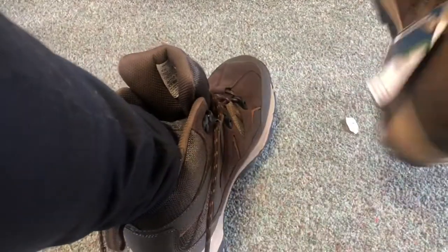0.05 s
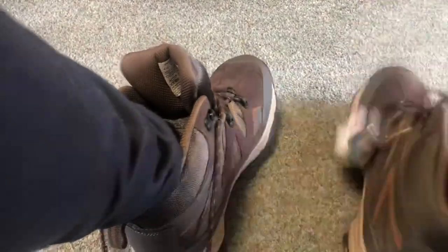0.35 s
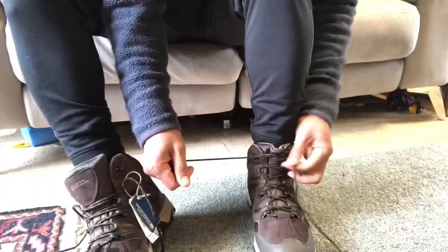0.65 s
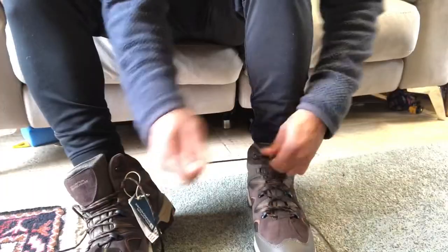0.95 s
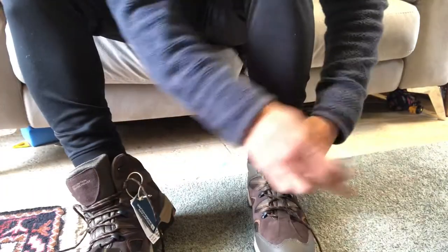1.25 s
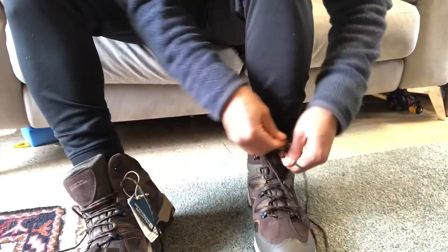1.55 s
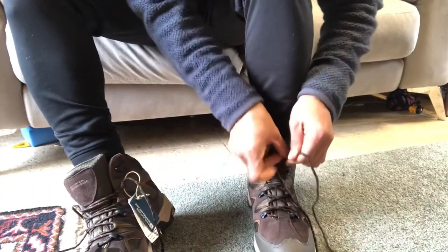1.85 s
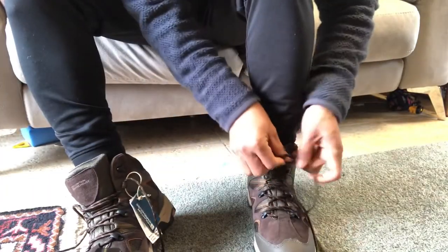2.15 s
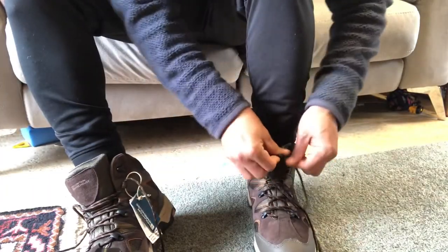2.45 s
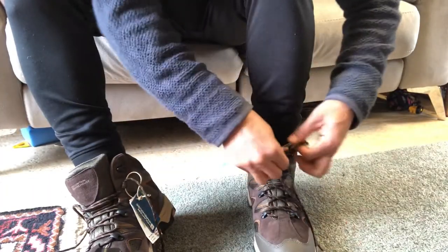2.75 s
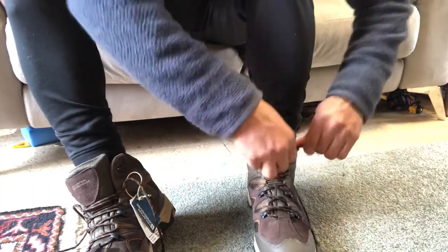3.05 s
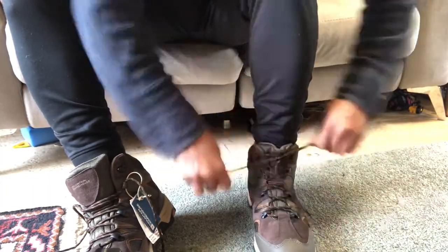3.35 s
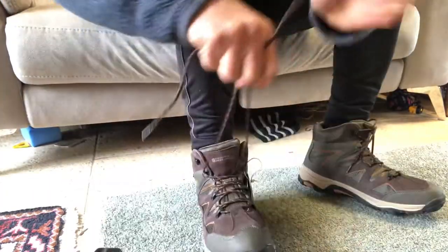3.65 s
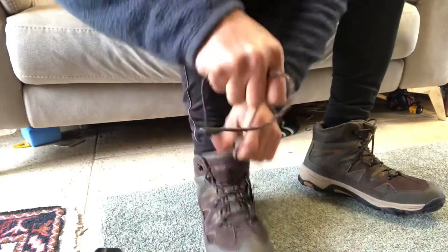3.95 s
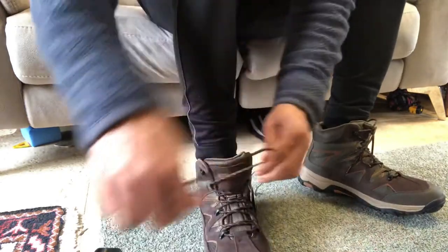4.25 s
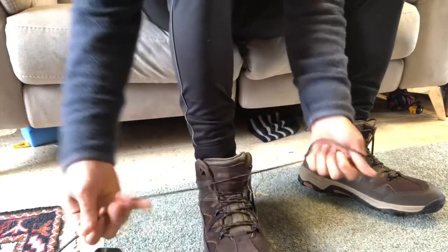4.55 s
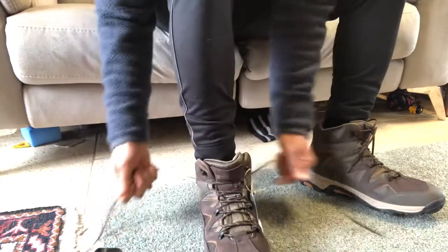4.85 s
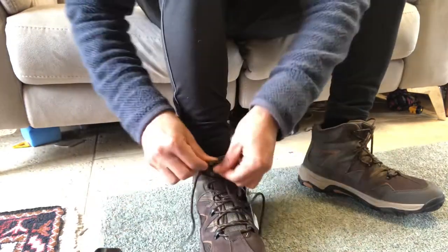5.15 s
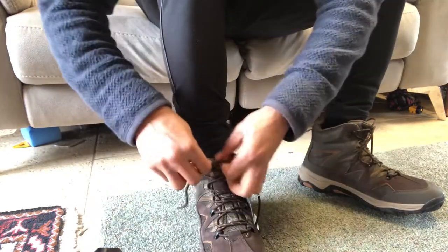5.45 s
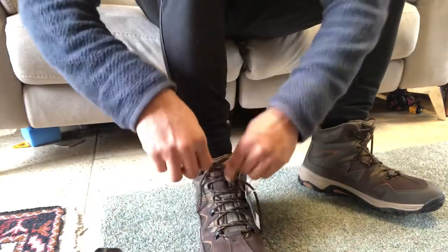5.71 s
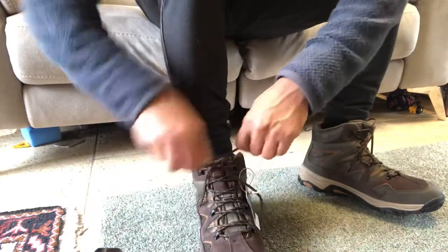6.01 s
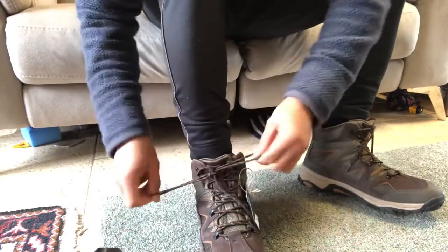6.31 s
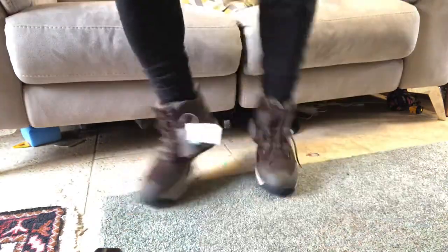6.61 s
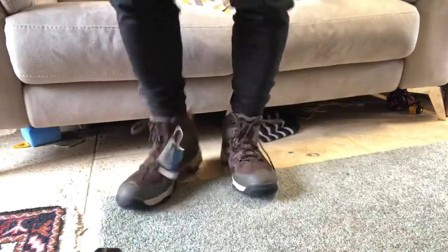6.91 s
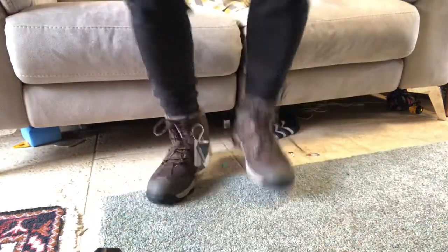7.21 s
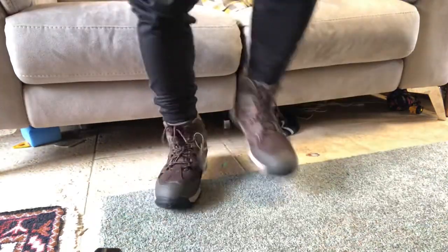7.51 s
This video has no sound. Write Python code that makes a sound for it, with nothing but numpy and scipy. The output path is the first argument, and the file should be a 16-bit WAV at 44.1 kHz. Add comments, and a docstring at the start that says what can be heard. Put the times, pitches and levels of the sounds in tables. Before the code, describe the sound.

Close to the microphone in a quiet living room, someone laces up walking boots. One knock and scrape of a sole comes first, followed by faint clothing rustle, short zips of lace and scattered ticks as it catches in the hooks. Near the end come about six quick, louder steps on the carpeted floor, with scuffs, rattling lace ends and a tiny metallic ring.

```python
"""Someone on a sofa laces up walking boots, close by in a quiet living room. Sleeves rustle over still
air and a faint hum as a boot is set down with a knock and a scuff. For six seconds braided laces swish
through the hooks and snap tight, plucking the leather. The hum swells again; then, from 6.6 s, the boots
step on the spot: a bit of metal rings, sole and heel slap and thump the carpeted floor, tag and lace ends
rattle. Near walls echo softly throughout, and the level dips briefly four times."""
import sys
import numpy as np
from scipy import signal
from scipy.fft import rfft, irfft, next_fast_len
from scipy.io import wavfile

SR = 44100
rng = np.random.default_rng(int(sys.argv[2]) if len(sys.argv) > 2 else 0)


def transcribe(u):
    """Save the signal u as a 16-bit wav file named by the first command-line argument.

    u: samples, shape (n,) or (channels, n), limited to [-1, 1]; the rate is SR.
    q: integer samples, one column per channel.
    """
    v = np.clip(np.atleast_2d(u).T, -1, 1)
    q = np.round(v * 32767).astype(np.int16)
    wavfile.write(sys.argv[1], SR, q)


N = 342657

# tone of the still air: (frequency [Hz], level [dB])
AIR_TONE = [(15, -38), (28, -1), (52, -7), (100, -5), (160, -6.5), (245, -5), (300, -9.5), (420, -9.5),
            (800, -14), (1780, -22), (4000, -25.5), (8000, -28.5), (15800, -31)]
# swells of a deep hum: (middle [s], half length [s], level [dB])
HUM_SWELLS = [(0.186, 0.14, -63), (6.295, 0.1, -55.5)]
# rustle riding on how briskly the limbs move: (time [s], level [dB])
RUSTLE_CURVE = [(0, -58), (.15, -73), (1.0, -76), (1.7, -62), (2.15, -90), (2.85, -67), (3.05, -83),
                (3.65, -87), (3.88, -64), (4.1, -70.5), (4.95, -64), (5.3, -73.5), (6.3, -72.5),
                (6.7, -56.5), (6.9, -64.5), (7.2, -56), (7.77, -65)]
# tone of brushing fabric: (frequency [Hz], level [dB])
FABRIC_TONE = [(80, -7.5), (250, -2.5), (600, 5), (1300, 1.5), (2000, -1), (3200, -4), (4500, -3.5),
               (7000, -10), (11000, -16), (16000, -8.5)]

# laces snapping taut and bumps on the leather: (time [s], level [dB], pitch [Hz], tick level [dB])
LACE_SNAPS = [(.213, -45, 704, -67), (.2492, -26.5, 565, -66), (.2615, -22.5, 980, -54),
              (.688, -52.5, 1320, -50), (1.199, -51, 544, -57), (1.233, -54, 1130, -50),
              (1.397, -62, 2500, -42.5), (1.440, -46, 814, -66), (2.4256, -37.5, 1700, -34),
              (2.4275, -39, 500, -56), (2.762, -48, 680, -68), (3.146, -37, 610, -49),
              (3.164, -36, 526, -50), (3.740, -47.5, 1290, -62), (3.862, -32.5, 990, -57),
              (3.899, -55, 1500, -47), (4.064, -44, 515, -51), (4.2838, -31.5, 1700, -37.5),
              (4.2865, -36.5, 530, -57), (4.640, -50, 554, -57), (4.762, -45, 664, -58),
              (4.961, -49, 1010, -43.5), (5.261, -49.5, 360, -60), (5.682, -49, 377, -61),
              (5.9610, -31.5, 1410, -23.5), (6.0850, -37, 1340, -43), (6.5912, -65, 1100, -36),
              (7.649, -38, 1147, -43.5)]
# tone of a lace ticking into a hook: (frequency [Hz], level [dB])
TICK_TONE = [(400, -30), (1200, -18), (2300, 9), (3200, 6.5), (4600, 4), (6500, -4), (9000, -6),
             (16000, -26)]
# tone of struck leather and tread: (frequency [Hz], level [dB])
LEATHER_TONE = [(100, -7.5), (250, -2.5), (420, 3), (580, 4), (800, 5.5), (1050, -3.5), (1500, -8.5),
                (2200, -14), (4000, -20.5), (10000, -37)]

# soles hitting the floor: (time [s], slap [dB], pitch [Hz], attack [cycles], thump [dB], crack [dB])
SOLE_HITS = [(0.2481, -18, 953, 1.33, -20, -54), (6.6168, -25, 1120, 1.8, -34.5, -46),
             (6.9407, -27, 1280, 1.22, -33.5, -58), (7.1369, -18, 1720, .7, -29.5, -36),
             (7.3200, -31.5, 1210, 1.25, -30, -48), (7.5125, -19, 1190, 1.1, -33.5, -34.5),
             (7.6960, -27, 1430, 1.06, -31.5, -56)]
# tone of the crack on top of a slap: (frequency [Hz], level [dB])
CRACK_TONE = [(400, -47), (1500, -10.5), (2500, 23), (4000, 6), (6000, -3), (9000, -21.5), (16000, -6)]
# short scuffs of sole and tag: (time [s], level [dB])
SCUFF_HITS = [(.262, -32), (.2793, -26.5), (.2850, -25.5), (.359, -50), (.387, -47), (6.625, -32.5),
              (6.6728, -21), (6.783, -47), (6.981, -42.5), (7.033, -42.5), (7.361, -37.5), (7.370, -34),
              (7.744, -37)]
# gritty tone of a scuff: (frequency [Hz], level [dB])
GRIT_TONE = [(300, -14), (1500, -3.5), (3500, 5.5), (5500, 6.5), (8000, -2), (11000, -1.5), (13000, -8),
             (16000, 3)]

# lace drawn through the hooks: (middle [s], half length [s], rasp [dB], pitch [Hz], tension [0-1])
LACE_PULLS = [(0.448, 0.0073, -53.5, 2280, 0.72), (.547, .015, -58.5, 1800, .25),
              (1.524, 0.044, -66.5, 4100, 0.81), (2.416, 0.0049, -59, 2500, 0.56),
              (3.195, 0.028, -51.5, 2150, 0.83), (3.762, 0.016, -64.5, 1360, 0.74),
              (4.214, 0.041, -68, 3400, 0.83), (4.318, 0.048, -59, 1280, 0.66),
              (4.455, 0.04, -57, 3740, 0.64), (4.58, 0.046, -53.5, 1330, .15),
              (4.891, 0.049, -63, 2000, 0.42), (5.926, 0.018, -54.5, 2270, 1), (6.716, .11, -59, 2580, 0.5),
              (6.979, 0.043, -63, 4430, 0.94)]
# loose lace slipping quickly through the fingers: (time [s], hiss level [dB])
LACE_FLICKS = [(.788, -67), (.952, -61), (1.685, -60.5), (1.764, -62.5), (1.825, -67.5), (1.947, -64),
               (2.598, -63.5), (3.45, -62), (3.494, -57), (4.051, -59), (4.714, -62), (5.254, -64),
               (5.486, -64.5), (5.604, -64.5), (5.955, -59), (6.471, -56.5)]
# airy top of a sliding lace: (frequency [Hz], level [dB])
HISS_TONE = [(800, -41), (2500, -2), (4000, 1), (6500, 2), (9500, -1), (12000, 2), (14500, 6),
             (16000, -1.5)]
# rough midrange of dragged braid: (frequency [Hz], level [dB])
RASP_TONE = [(150, -29), (500, -16), (900, 4.5), (1400, 10.5), (2300, -2), (4500, -6), (7000, -7.5),
             (12000, -18)]
# hollow hum of the boot shaft: (frequency [Hz], level [dB])
SHAFT_TONE = [(60, -33), (120, -21), (180, -10), (290, -6.5), (390, 1.5), (560, -9.5), (800, -15),
              (1900, -23.5), (2280, -20), (2750, -26), (5000, -45)]

# knocks that ring a small metal piece on the boot: (time [s], level [dB])
METAL_HITS = [(6.591, -73), (6.673, -72)]
# modes of that metal piece: (frequency [Hz], relative level [dB], t60 [s])
METAL_MODES = [(9670, -2, 2.4), (9610, -3, 1.6), (5280, -4, 0.8), (4530, 5, .9)]
# heels landing under the body's weight: (time [s], strength [dB], pitch [Hz], thump [dB])
HEEL_HITS = [(6.6436, -18.5, 1536, -27.5), (6.9781, -28.5, 1170, -38), (7.175, -25.5, 1310, -26.5),
             (7.3532, -20, 1310, -31.5), (7.5621, -27, 1500, -34.5), (7.7228, -18.5, 1340, -35)]
# modes of the heel cup: (frequency [Hz], relative level [dB], t60 [s])
HEEL_CUP_MODES = [(2330, -27, 0.08), (2480, -31, 0.15), (2729, -29, .08)]

# modes of the floor: (frequency [Hz], relative level [dB], t60 [s])
FLOOR_RESONANCES = [(59.5, 10.5, 0.44), (93, -1, 0.46), (128, -20, 0.19), (157, -9, 0.36), (207, -16, 0.33),
                    (240, 3, .3)]
# first echoes off floor, sofa and walls: (delay [s], gain [ratio])
ECHO_TAPS = [(.0013, 0.12), (.0029, -0.13), (.0047, 0.049), (.0083, -.1), (0.0126, 0.12)]
# overall reverb send, lower for a closer sound: (time [s], level [dB])
REVERB_SEND = [(0, 0.5), (.42, -4.5), (.44, -3), (7.77, -2)]
# decay of the room: (frequency [Hz], t60 [s])
REVERB_DECAY = [(80, 0.22), (250, .5), (700, .5), (2000, 0.25), (5000, 0.67), (14000, 0.04)]
# tone of the room's reflections: (frequency [Hz], level [dB])
REVERB_TONE = [(60, 1), (200, -5.5), (500, -5), (1000, -8), (2500, -6.5), (5000, -7.5), (14000, -7)]
# brief dips in level: (time [s], half width [s])
LEVEL_DIPS = [(0.415, 0.028), (3.415, .04), (5.018, 0.034), (6.514, 0.02)]


def amp(db):
    """Decibels to gain."""
    return 10 ** (np.asarray(db) / 20)


def unit_rms(x):
    """Scales to rms 1."""
    return x / np.sqrt(np.mean(x ** 2) + 1e-20)


def curve_at(points, hz):
    """Reads a curve on a log-frequency axis."""
    point_hz, value = np.transpose(points)
    return np.interp(np.log(hz + 1), np.log(point_hz + 1), value)


def clock(size):
    """Sample times in seconds."""
    return np.arange(size) / SR


def fader(curve):
    """Gain that rides a dB curve through the scene."""
    return amp(np.interp(clock(N), *np.transpose(curve)))


def swell(s, half):
    """A smooth rise and fall around time s."""
    return np.exp(-((clock(N) - s) / half) ** 2 / 2)


def add(mix, s, sound):
    """Mixes a sound in at time s."""
    part = mix[max(round(s * SR), 0):][:len(sound)]
    part += sound[:len(part)]


def colour(x, tone):
    """Minimum-phase EQ of unit energy: the tone curve sets only the shape."""
    gains = amp(curve_at(tone, np.fft.rfftfreq(2048, 1 / SR)))
    cepstrum = irfft(np.log(gains))
    causal = np.r_[cepstrum[0], 2 * cepstrum[1:1024]]
    taps = irfft(np.exp(rfft(causal, 2048)))
    return signal.oaconvolve(x, taps / np.linalg.norm(taps))[:len(x)]


def drift(hz):
    """A random wander of rms 1, rolled off above hz."""
    size = next_fast_len(N, real=True)
    lowpass = np.exp(-(np.fft.rfftfreq(size, 1 / SR) / hz) ** 2)
    return unit_rms(irfft(rfft(rng.standard_normal(size)) * lowpass, size)[:N])


def friction(per_s, spread_db, hiss, flutter_db):
    """Fibres catching and slipping: tiny clicks of uneven size over a smooth hiss."""
    sizes = amp(spread_db * np.minimum(rng.exponential(1, N), 2.8))
    clicks = (rng.random(N) < per_s / SR) * rng.choice([-1, 1], N) * sizes
    texture = unit_rms(clicks) + hiss * rng.standard_normal(N)
    return unit_rms(texture * amp(flutter_db * np.tanh(drift(40))))


def knock(hz, cycles, sag, size=6000):
    """A damped wave that peaks after some cycles; its pitch sags, as low bending waves travel slowest."""
    age = clock(size) * hz / cycles  # 1 at the peak
    turns = cycles * (1 + sag) / sag * np.log1p(sag * age)
    return (age * np.exp(1 - age)) ** 2 * np.sin(2 * np.pi * turns)


def burst(decay_s, tone, size=3000):
    """A puff of coloured noise with a sharp attack and a peak near 1."""
    puff = colour(rng.standard_normal(size) * np.exp(-clock(size) / decay_s), tone)
    return 0.68 * puff / np.sqrt(np.sum(puff ** 2) / (decay_s * SR / 2))


def ring(modes, size):
    """A struck body rings as a sum of dying sines."""
    t = clock(size)
    return sum(amp(db - 60 * t / t60) * np.sin(2 * np.pi * hz * t) for hz, db, t60 in modes)


def room_tone(air_db=-67, hum_hz=51):
    """A bed of still air, with a faint deep hum that swells twice."""
    swells = sum(amp(db) * swell(s, half) for s, half, db in HUM_SWELLS)
    hum = np.sqrt(2) * swells * np.sin(2 * np.pi * hum_hz * clock(N))
    return amp(air_db) * colour(rng.standard_normal(N), AIR_TONE) + hum


def cloth(sleeve_db=-9, lag_s=0.039):
    """Fleece and trouser legs brush as the limbs move, and a sleeve trails every pull."""
    sleeves = sum(amp(db + sleeve_db) * swell(s + lag_s, half=0.06) for s, _, db, _, _ in LACE_PULLS)
    fibres = friction(per_s=500, spread_db=6, hiss=1.6, flutter_db=5.5)
    return colour(fibres * np.hypot(fader(RUSTLE_CURVE), sleeves), FABRIC_TONE)


def snaps(tick_s=0.0015, creak_s=0.011):
    """A lace jumps into a hook with a tick and plucks the leather, which gives and creaks."""
    out = np.zeros(N)
    for s, db, hz, tick_db in LACE_SNAPS:
        grit = burst(tick_s, TICK_TONE)
        click = colour(signal.unit_impulse(len(grit)), TICK_TONE)
        add(out, s, amp(tick_db) * (0.85 * click + 0.58 * grit))
        add(out, s, amp(db) * knock(hz, cycles=1.16, sag=0.47))
        add(out, s, amp(db - 10) * burst(creak_s, LEATHER_TONE))
        add(out, s + 0.0018, amp(db - 13) * knock(hz=500, cycles=0.55, sag=0.35))  # dull give
    return out


def footfalls(sole_body_db=-32, sole_weight_db=-49, sole_thump_hz=117.5, heel_thump_hz=143):
    """Layer settings for each hit: soles land light, with one body and weight level; heels bear down."""
    for s, db, hz, cycles, thump_db, crack_db in SOLE_HITS:
        yield s, db, hz, cycles, sole_body_db, thump_db, sole_thump_hz, crack_db, sole_weight_db
    for s, db, hz, thump_db in HEEL_HITS:
        slap_db, crack_db, weight_db, cycles = db - 5.5, db - 6.5, db - 15, 1.4
        yield s, slap_db, hz, cycles, db, thump_db, heel_thump_hz, crack_db, weight_db


def boots(crack_s=0.0021, tread_s=0.012, low_cut_hz=62, floor_ring_db=-76):
    """Rubber slaps, the tread settles, the hollow boot answers, the floor thumps and gives."""
    slaps, thumps = np.zeros(N), np.zeros(N)
    for s, slap_db, hz, cycles, body_db, thump_db, thump_hz, crack_db, weight_db in footfalls():
        add(slaps, s, amp(slap_db) * knock(hz, cycles, sag=0.16))
        add(slaps, s, amp(slap_db - 9.5) * knock(1.587 * hz, 2 * cycles, sag=0.057))  # stiff sole edge
        add(slaps, s, amp(crack_db) * burst(crack_s, CRACK_TONE))
        add(slaps, s + 0.0015, amp(body_db - 9) * knock(0.481 * hz, cycles=1, sag=0.42))  # heel block
        tread_gain = amp(-15) * (amp(body_db) + amp(slap_db) / 2)
        add(slaps, s + 0.00199, tread_gain * burst(tread_s, LEATHER_TONE))
        add(thumps, s + 0.0023, amp(body_db) * knock(hz=265, cycles=0.49, sag=0.25))
        add(thumps, s + 0.0031, amp(weight_db) * knock(hz=60, cycles=1.22, sag=0.021, size=12000))
        add(thumps, s + 0.0036, amp(thump_db) * knock(thump_hz, cycles=1.09, sag=0.2))
    # a floor radiates its slowest motion poorly
    thumps = signal.lfilter(*signal.butter(1, low_cut_hz, "high", fs=SR), thumps)
    floor_ring = signal.oaconvolve(thumps, ring(FLOOR_RESONANCES, size=30000))[:N]
    return slaps + thumps + amp(floor_ring_db) * floor_ring


def scuffs(hits, attack_s=0.000067, decay_s=0.0032):
    """Sole, tag or lace end scrapes brightly just after a boot lands."""
    out = np.zeros(N)
    for s, db in hits:
        scrape = burst(decay_s, GRIT_TONE)
        attack = 1 - np.exp(-clock(len(scrape)) / attack_s)
        add(out, s, amp(db) * scrape * attack)
    return out


def lace_strokes(flick_half_s=0.014, flick_hz=2800):
    """Tension brings out hiss and shaft hum in a pull; a flick is slack and mostly hiss."""
    for s, half, rasp_db, hz, tension in LACE_PULLS:
        hiss_db = rasp_db + np.interp(tension, [0, 1], [-10, 3])
        shaft_db = rasp_db + np.interp(tension, [0, 1], [-24.5, 7.5])
        yield s, half, hiss_db, rasp_db, hz, shaft_db, tension
    for s, hiss_db in LACE_FLICKS:
        rasp_db, shaft_db, tension = hiss_db - 9.5, hiss_db - 8, 0
        yield s, flick_half_s, hiss_db, rasp_db, flick_hz, shaft_db, tension


def laces(slack_q=3.1, tension_q=3.8):
    """Braid dragged over metal and leather hisses, rasps at a pitch set by speed and hums the shaft."""
    slip = friction(per_s=3000, spread_db=5.0, hiss=0.84, flutter_db=1.7)
    drag = friction(per_s=1700, spread_db=-1.5, hiss=0.63, flutter_db=5.5)
    hiss, scrape, shaft = colour(slip, HISS_TONE), colour(drag, RASP_TONE), colour(slip, SHAFT_TONE)
    out = np.zeros(N)
    for s, half, hiss_db, rasp_db, rasp_hz, shaft_db, tension in lace_strokes():
        at = np.arange(max(int((s - 2 * half) * SR), 0), min(int((s + 2 * half) * SR), N))
        envelope = np.exp(-abs((at / SR - s) / half) ** 3 / 2) * signal.windows.tukey(len(at), 0.2)
        q = slack_q + tension_q * tension ** 2  # taut braid runs evenly, narrowing the rasp to a zip
        ribs = unit_rms(signal.lfilter(*signal.iirpeak(rasp_hz, q, SR), drag[at]))
        rasp = unit_rms(ribs + 0.76 * scrape[at])
        out[at] += envelope * (amp(hiss_db) * hiss[at] + amp(rasp_db) * rasp + amp(shaft_db) * shaft[at])
    return out


def metal_jingle():
    """A small piece of metal rings faintly as the boots start to step."""
    out, ping = np.zeros(N), ring(METAL_MODES, size=50000)
    for s, db in METAL_HITS:
        add(out, s, amp(db) * ping)
    return out


def heel_ring():
    """Each heel hit sets the stiff heel cup ringing briefly."""
    out, cup = np.zeros(N), ring(HEEL_CUP_MODES, size=8000)
    for s, db, _, _ in HEEL_HITS:
        add(out, s + 0.002, amp(db) * cup)
    return out


def rattle_hits(count=4, within_s=0.18, below_db=25.5, spread_db=17):
    """Tag and lace ends swing against the boot at random moments after each heel hit."""
    for s, db, _, _ in HEEL_HITS:
        for late, weak in rng.random((count, 2)):
            yield s + within_s * late, db - below_db - spread_db * weak


def early_echoes(x):
    """The direct sound plus its bounces off near surfaces, milliseconds later."""
    out = x.copy()
    for delay, gain in ECHO_TAPS:
        add(out, delay, gain * x)
    return out


def reverb(x, predelay_s=0.0035, echoes_per_s=4000, size=32768):
    """Dense reflections off walls and furniture, each band dying at its own speed."""
    taps = rng.choice([-1., 1.], size) * (rng.random(size) < echoes_per_s / SR)
    taps *= clock(size) > predelay_s
    hz, t, bands = signal.stft(unit_rms(taps), SR, nperseg=256)
    t60 = curve_at(REVERB_DECAY, hz)[:, None]
    decay = amp(curve_at(REVERB_TONE, hz)[:, None] - 60 * t / t60)
    energy_trim = np.sqrt(np.log(1e6) / (t60 * SR))  # long and short tails carry equal energy
    _, tail = signal.istft(bands * decay * energy_trim, SR, nperseg=256)
    return signal.oaconvolve(x, tail)[:N]


def scene():
    """Close steps, snaps and rubbing with their echoes over the room tone, in mono."""
    steps = boots() + heel_ring()
    clicks = snaps()
    rubbing = laces() + cloth() + scuffs([*SCUFF_HITS, *rattle_hits()])
    send = fader(REVERB_SEND) * (amp(2) * steps + clicks + amp(-2) * rubbing)
    return (early_echoes(steps + rubbing) + clicks + metal_jingle() + reverb(send) + room_tone())[None]


def record(dry, high_cut_hz=15950):
    """The level dips briefly four times, and a steep high cut trims the very top."""
    for s, half in LEVEL_DIPS:
        opening = np.minimum(abs(clock(N) - s) / half, 1)
        dry = dry * np.sin(np.pi / 2 * opening) ** 1.06
    high_cut = signal.firwin(511, high_cut_hz, window=("kaiser", 9), fs=SR)
    return signal.oaconvolve(dry, high_cut[None], "same")


dry = scene()
out = record(dry)
transcribe(out)
```